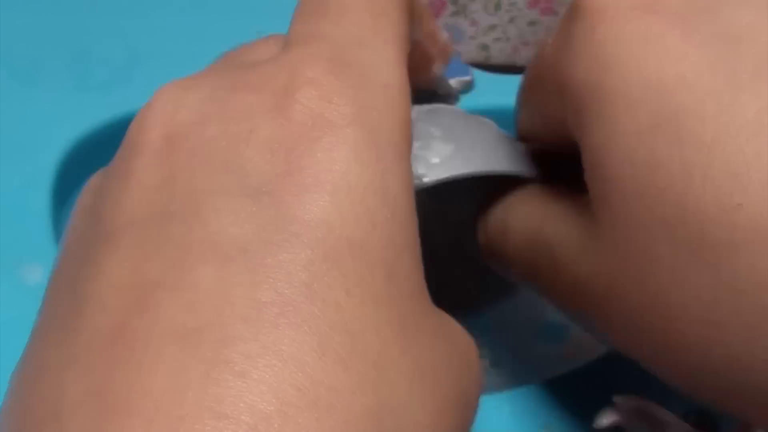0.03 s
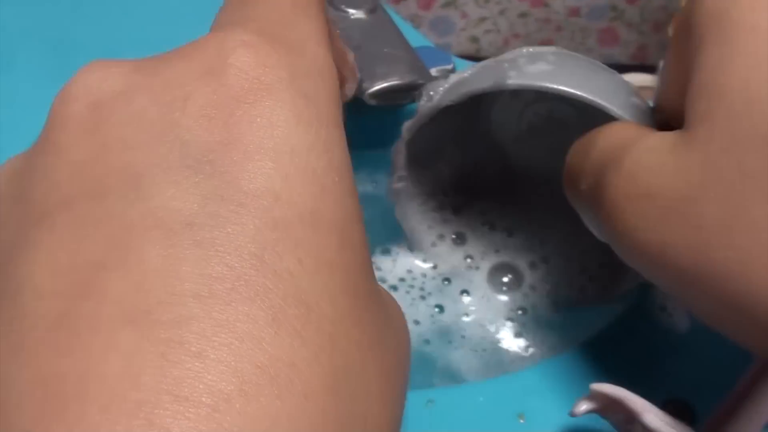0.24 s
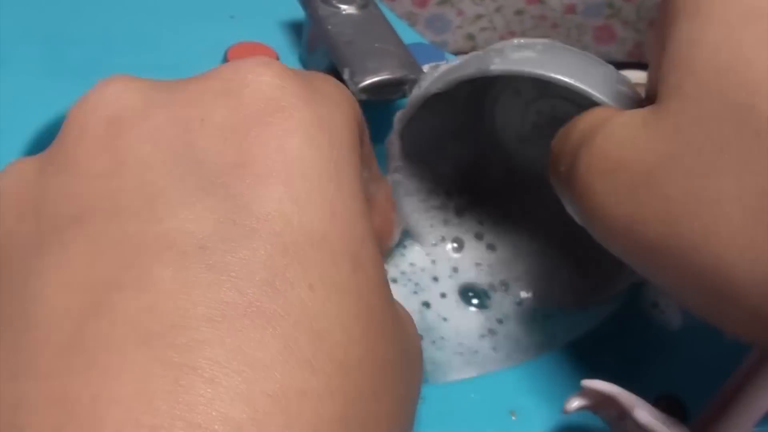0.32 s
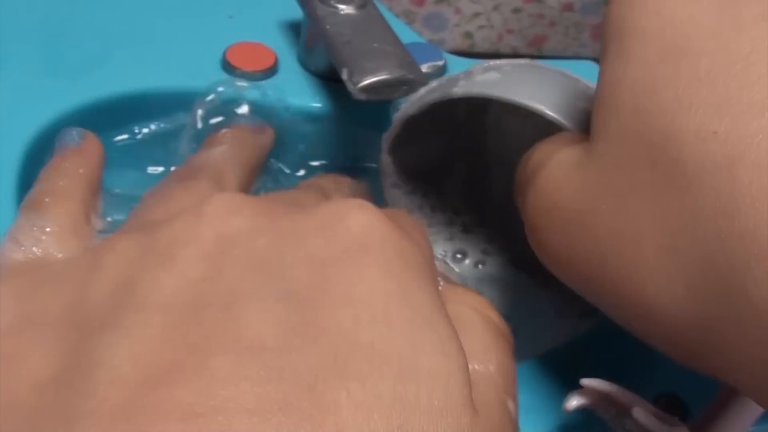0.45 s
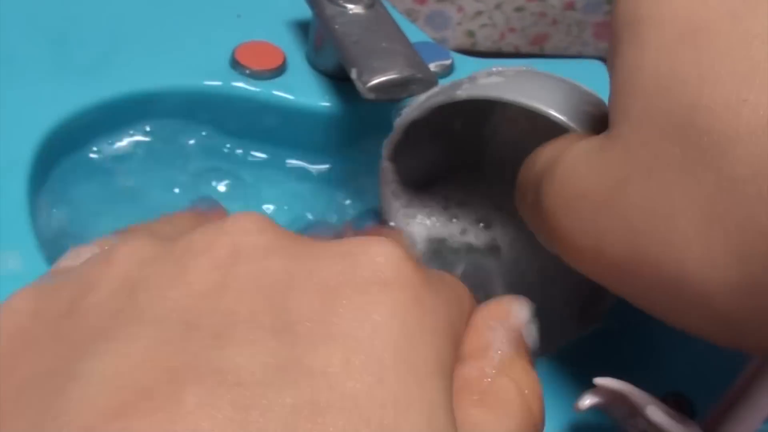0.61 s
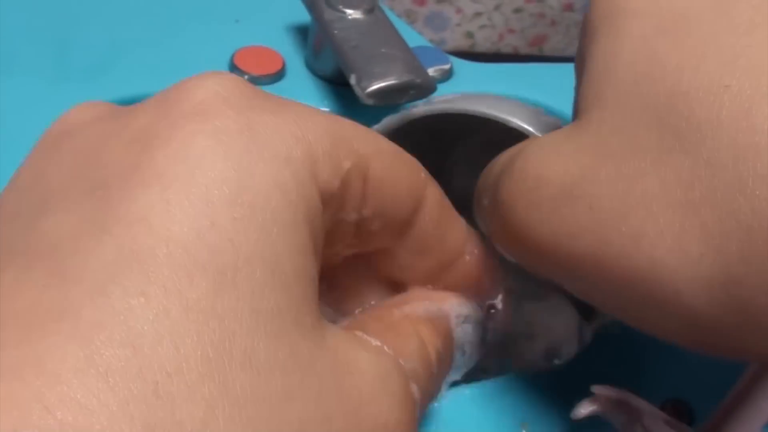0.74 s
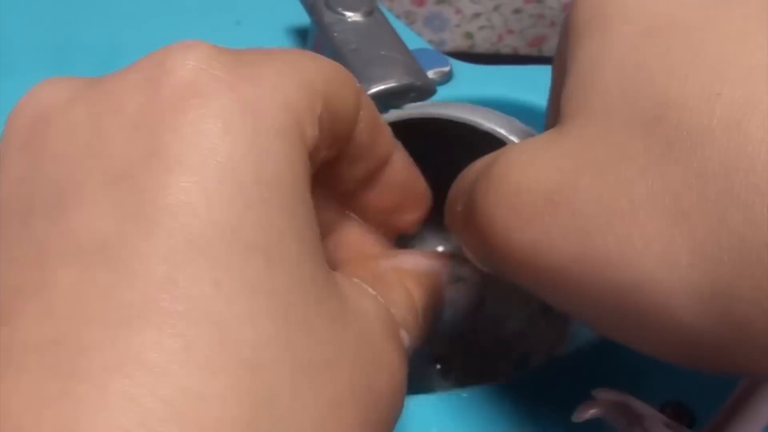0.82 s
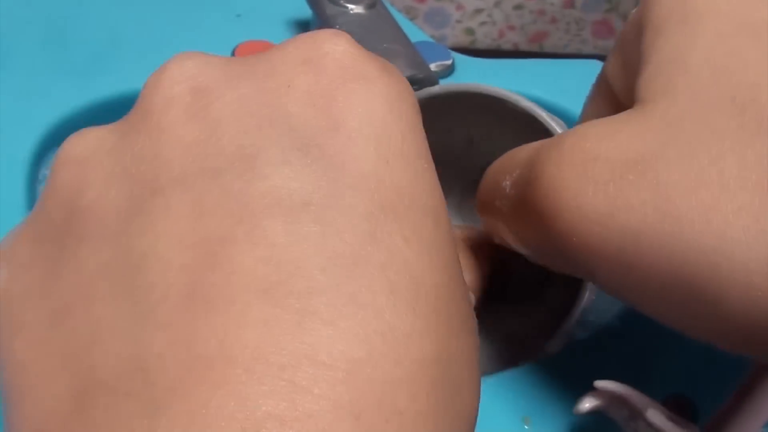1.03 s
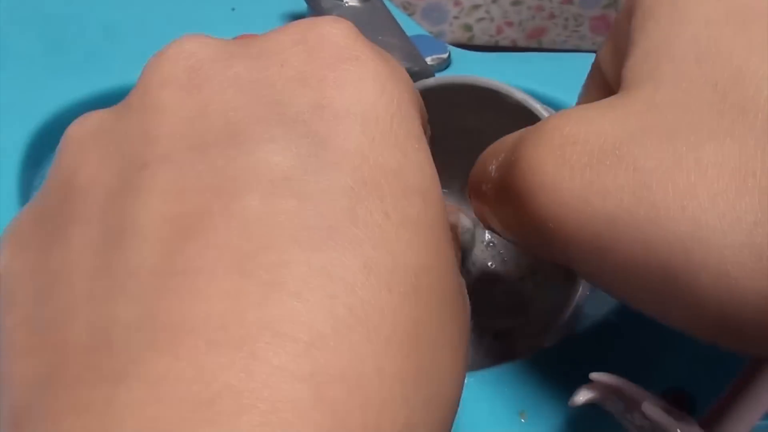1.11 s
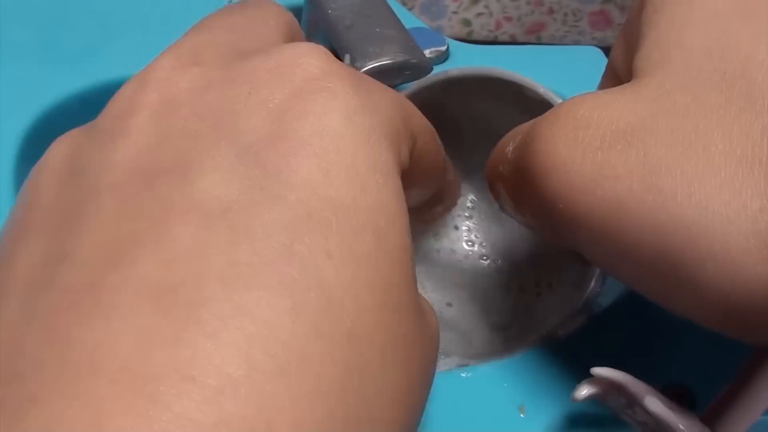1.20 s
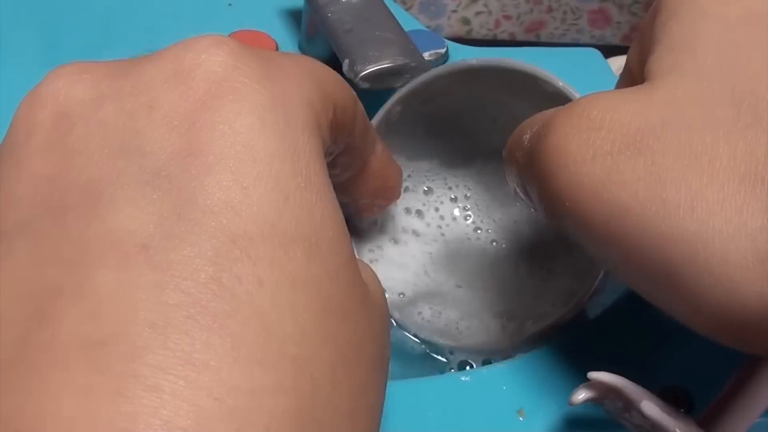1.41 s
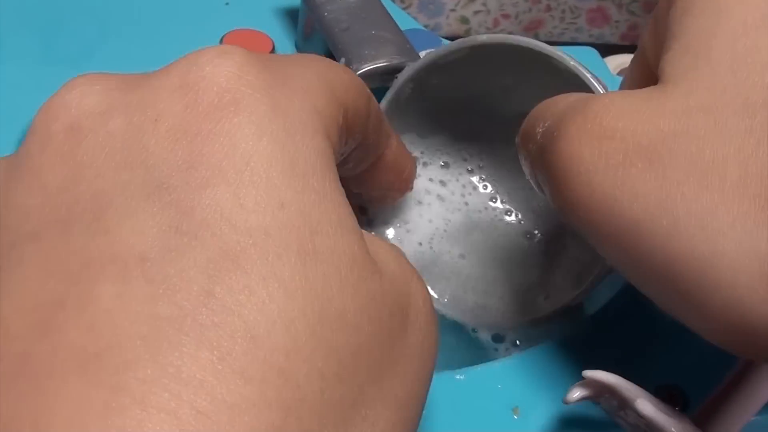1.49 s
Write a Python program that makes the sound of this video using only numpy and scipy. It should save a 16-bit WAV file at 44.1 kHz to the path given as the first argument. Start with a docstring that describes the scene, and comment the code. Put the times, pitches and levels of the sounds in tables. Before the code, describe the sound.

A small plastic cup being washed in soapy water, knocking and scraping against a plastic basin.

```python
"""A quiet room, microphone close to a shallow plastic toy sink where wet hands scrub a small plastic cup.
Soft rubbing and nail ticks come first, then a crackle of foam. At 0.22 s the cup knocks hard and the
hollow basin rings. Scrapes, knocks and popping bubbles follow, with low bumps through the table.
After 1 s the rubbing eases; knocks, a sharp tick and low plops come from 1.2 s, a last light knock
at 1.53 s. The room hisses faintly throughout."""
import sys
import numpy as np
from scipy import signal
from scipy.fft import rfft, irfft
from scipy.io import wavfile
from scipy.ndimage import uniform_filter1d

SR = 44100
rng = np.random.default_rng(int(sys.argv[2]) if len(sys.argv) > 2 else 0)


def dump(signal):
    """Clip the signal to [-1, 1] and save it as 16-bit WAV at the path in sys.argv[1]."""
    limited = np.clip(np.atleast_2d(signal).T, -1, 1)
    pcm = np.round(limited * 32767).astype(np.int16)
    wavfile.write(sys.argv[1], SR, pcm)


N = 68355

# cup striking the basin: start_s, low_modes_db, middle_modes_db, upper_modes_db, contact_s
CUP_KNOCKS = [(0.221, -13, -9, -10, 0.0077), (0.336, -36, -32, -24, 0.0014), (0.378, -34, -34, -50, 0.0014),
              (0.5139, -17, -17.5, -16.5, 0.0026), (0.6, -27, -25, -30, 0.0012),
              (0.68, -28, -23, -26.5, 0.0019), (0.78, -16.5, -25, -18, 0.0056),
              (0.7947, -22, -23, -28, 0.0045), (0.943, -24.5, -29.5, -44, 0.0006),
              (1.071, -33, -31.5, -36, 0.0021), (1.1555, -44, -40, -36, 0.0026),
              (1.2292, -40, -28, -28, 0.00089), (1.2767, -56, -30, -22, 0.0024),
              (1.2789, -24, -21, -37, 0.00086), (1.205, -60, -50, -37, 0.0044),
              (1.533, -41.5, -31, -35.5, 0.0044)]
# resonances of basin and cup: pitch_hz, level_db, t60_s
PLASTIC_MODES = [(205, -15, .05), (245, -9, .05), (320, 0, .038), (392, -3, .034), (460, -6, .035),
                 (555, -5, .03), (728, 0, .03), (868, -2, .035), (975, -5, .025), (1130, -4, .025),
                 (1250, -4, .026), (1450, -4, .02), (1670, -3, .02), (2130, -9, .02), (2400, -6, .022),
                 (3800, -10, .015)]
# scraping and sloshing: start_s, length_s, low_modes_db, middle_modes_db, upper_modes_db, fizz_db
SCRUB_STROKES = [(0, 0.14, -56, -57.5, -62, -58), (0.204, 0.067, -41.5, -37, -43, -48.5),
                 (0.227, 0.082, -36.5, -41.5, -49.5, -55.5), (0.311, 0.042, -35.5, -43, -40.5, -45.5),
                 (0.343, 0.048, -39, -45.5, -56, -54.5), (0.432, 0.066, -38.5, -48, -46, -52.5),
                 (0.45, 0.046, -59, -60, -55, -41), (0.504, 0.014, -59, -30.5, -35.5, -39.5),
                 (0.541, 0.061, -40.5, -44.5, -48.5, -49.5), (0.603, 0.046, -45, -52, -58, -56),
                 (0.655, 0.014, -46, -49, -43, -36.5), (0.67, 0.27, -42, -41, -47.5, -51.5),
                 (0.762, 0.037, -42, -41.5, -32, -41), (0.774, 0.02, -35.5, -27, -33, -31.5),
                 (0.794, 0.021, -48, -37, -48, -55), (0.794, 0.17, -41.5, -45.5, -44.5, -57),
                 (0.891, 0.043, -36.5, -36, -36, -39.5), (0.947, 0.0543, -42.5, -51.5, -57, -52.5),
                 (1.015, 0.14, -57, -72, -59.5, -70), (1.14, 0.2, -56, -59.5, -55, -57.5),
                 (1.266, 0.03, -44, -62, -60, -44), (1.265, 0.049, -44.5, -62, -50, -51),
                 (1.317, 0.064, -53, -55, -54, -58), (1.385, 0.022, -54, -40.5, -47.5, -54),
                 (1.409, 0.026, -42, -54, -56.5, -74), (1.461, 0.1, -80, -62, -59, -78)]
# spectrum of wet skin and foam: frequency_hz, level_db
FIZZ_SPECTRUM = [(1650, 4), (2800, -5), (4400, -0.5), (6190, -6), (8090, -1.5), (10000, -13), (13000, -17),
                 (16500, -39)]
# sharp ticks of nail and rim: start_s, peak_db, centre_hz, decay_s
NAIL_TICKS = [(.007, -36.5, 5530, 0.00091), (.053, -37, 4940, 0.0011), (.102, -36.5, 4200, 0.00025),
              (.112, -40, 4540, 0.00067), (.125, -35, 8500, .0008), (.168, -33, 4620, 0.00035),
              (.2202, -5, 8170, 0.00032), (0.2205, -14, 4030, 0.002), (.2392, -21.5, 5640, 0.00047),
              (.2394, -17, 10400, 0.00029), (.336, -33, 4100, 0.0032), (.341, -21.5, 5830, 0.0032),
              (.380, -37, 4200, 0.00012), (.432, -35, 4940, 0.0004), (.502, -26, 7700, 0.0023),
              (.5128, -16, 5250, 0.0016), (.598, -24.5, 9000, 0.0012), (.599, -26.5, 4420, 0.00046),
              (0.666, -29, 4750, 0.013), (.757, -24, 8050, 0.0029), (.781, -25.5, 3770, 0.0028),
              (.889, -21, 3870, 0.0026), (.9415, -26, 7600, 0.0013), (.969, -37, 7840, 0.0011),
              (1.0765, -24, 8140, 0.00059), (1.231, -27.5, 8200, 0.00071), (1.2758, -13.5, 9200, 0.0035),
              (1.2762, -20.5, 3980, 0.00036), (1.311, -29.5, 8600, 0.0021), (1.5325, -28.5, 4400, 0.0023)]
# bubbles and plops: start_s, level_db, pitch_hz, t60_s
BUBBLE_POPS = [(0.029, -38, 1135, 0.039), (0.323, -25, 846, 0.1), (0.351, -23, 450, 0.053),
               (.358, -35, 503, 0.0055), (.381, -25, 1350, 0.017), (.389, -25.5, 548, 0.027),
               (.432, -24.5, 2070, 0.0075), (.456, -21.5, 1280, 0.024), (.4645, -20, 1360, 0.011),
               (.610, -26, 3260, 0.0033), (.641, -33.5, 2220, 0.011), (0.717, -28, 1450, 0.012),
               (.741, -24, 1490, 0.0078), (0.8895, -12.5, 1670, 0.01), (0.8895, -13.5, 2080, 0.0073),
               (0.928, -19.5, 1390, 0.0089), (0.971, -29.5, 1476, 0.012), (1.2338, -16, 298, 0.046),
               (1.295, -34, 350, 0.099), (1.324, -27, 345, 0.015), (1.407, -22, 296, 0.03)]
# snaps in one crackle of foam: start_s, peak_db
FOAM_SNAPS = [(.1622, -25), (.1634, -27), (.1660, -28), (.1678, -29), (.1718, -35), (.1752, -39),
              (.180, -44)]
# level contour of the bumps through the table: time_s, level_db
BUMP_LEVELS = [(0.0, -65), (0.176, -99), (0.224, -35), (0.272, -50), (0.392, -53), (0.414, -61),
               (0.53, -43.5), (0.578, -63), (0.604, -47.5), (0.638, -59), (0.686, -40.5), (0.708, -54.5),
               (1.204, -62.5), (1.23, -51.5), (1.312, -47.5), (1.36, -58.5), (1.506, -70), (1.55, -52.5)]
# filter from the reflections to the stereo side signal: frequency_hz, gain_db
SIDE_SPECTRUM = [(60, -33), (110, -19), (200, -31), (380, -22.5), (700, -15.5), (1290, -15), (2380, -12),
                 (4400, -14.5), (8120, -19), (15000, -52)]
# spectrum of the room tone: frequency_hz, level_db
ROOM_SPECTRUM = [(15, -53), (25, -18), (192, -5.5), (321, -4.5), (470, -8.5), (809, -5.5), (1090, -10.5),
                 (2980, -19.5), (7300, -18.5), (15200, -24), (16500, -26)]

MODE_BAND_EDGES_HZ = (0, 500, 1000, 9000)  # low, middle and upper modes
KNOCK_DETUNE, SLIP_DETUNE = .015, .07  # scatter, as a fraction of each mode's pitch
STROKE_RISE_S, STROKE_FALL_S = .0067, .0034
SLIPS_PER_S, SLIP_SPREAD_DB = 1500, 2.5
FIZZ_PER_S, FIZZ_SPREAD_DB = 7000, 3.2
TICK_BROAD_DB, TICK_TAIL_DB, TICK_TAIL_S = .5, -65, .0076
POP_ATTACK_CYCLES, POP_RISE_PER_S = .9, 3.63  # rise in multiples of the starting pitch
FOAM_RING_HZ, FOAM_T60_S, SNAP_RISE_S, SNAP_DECAY_S = (6700, 7600), .003, .00036, .0012
ROOM_T60_S, ROOM_MID_DB, ROOM_SIDE_DB = .12, -51, -72
REFLECTION_T60_S, STEREO_DRIFT_HZ = .03, 1.9


def gain_of(db):
    return 10 ** (np.asarray(db) / 20)


def unit_rms(x):
    return x / np.sqrt(np.mean(x ** 2) + 1e-20)


def colour(x, spectrum):
    """Filters by a spectrum of (frequency_hz, gain_db) points."""
    hz, db = np.transpose(spectrum)
    bins_hz = np.fft.rfftfreq(len(x), 1 / SR)
    gain = gain_of(np.interp(np.log(bins_hz + 1), np.log(hz + 1), db))
    return irfft(rfft(x) * gain, len(x))


def add(mix, start_s, sound):
    part = mix[round(start_s * SR):][:len(sound)]
    part += sound[:len(part)]


def ring(hz, t60_s):
    t = np.arange(5000) / SR
    return gain_of(-60 * t / t60_s) * np.sin(2 * np.pi * hz * t)


def clicks(per_s, spread_db):
    """Impulses of random time, size and sign."""
    size = gain_of(spread_db * np.minimum(rng.exponential(1, N), 3))
    return size * rng.choice([-1., 1.], N) * (rng.random(N) < per_s / SR)


def plastic_body(pitch_ratios):
    """Impulse responses of the low, middle and upper modes; neighbours start in opposite phase."""
    modes = [(hz, (-1) ** k * gain_of(db) * ring(hz * pitch_ratios[k], t60_s))
             for k, (hz, db, t60_s) in enumerate(PLASTIC_MODES)]
    return [sum(mode for hz, mode in modes if low < hz < high)
            for low, high in zip(MODE_BAND_EDGES_HZ, MODE_BAND_EDGES_HZ[1:])]


def cup_knocks():
    """The cup hits the basin: a rounded first contact and a short chatter set the modes ringing."""
    out, t = np.zeros(N), np.arange(880) / SR
    for start_s, *bands_db, contact_s in CUP_KNOCKS:
        noise = rng.standard_normal(900)
        force = .035 * noise[:len(t)] * np.exp(-t / contact_s)  # chatter
        force[0] = 1  # first contact
        force = uniform_filter1d(np.r_[np.zeros(6), force], size=7)
        body = plastic_body(1 + KNOCK_DETUNE * noise[-len(PLASTIC_MODES):])
        for db, response in zip(bands_db, body):
            knock = signal.fftconvolve(force, response)
            add(out, start_s, gain_of(db) * knock / abs(knock).max())
    return out


def scrubbing():
    """Uneven slips ring the modes during each stroke; fine fizz of wet skin and foam lies on top."""
    t, power = np.arange(N) / SR, np.zeros((4, N))
    for start_s, length_s, *layers_db in SCRUB_STROKES:
        rise = np.clip((t - start_s) / STROKE_RISE_S, 0, 1)
        fall = np.exp(-np.maximum(t - start_s - length_s, 0) / STROKE_FALL_S)
        power += (gain_of(layers_db)[:, None] * rise * fall) ** 2
    # water and grip shift the modes
    grips = [plastic_body(1 + SLIP_DETUNE * rng.standard_normal(len(PLASTIC_MODES))) for _ in range(6)]
    layers = np.zeros((4, N))  # three bands of modes, then the fizz
    for band, responses in enumerate(zip(*grips)):
        for response in responses:
            slips = uniform_filter1d(clicks(SLIPS_PER_S / len(grips), SLIP_SPREAD_DB), size=7)
            layers[band] += signal.oaconvolve(slips, response)[:N]
    layers[3] = colour(clicks(FIZZ_PER_S, FIZZ_SPREAD_DB), [(1000, -50), *FIZZ_SPECTRUM])
    return sum(unit_rms(layer) * level for layer, level in zip(layers, np.sqrt(power)))


def nail_ticks():
    """Nail and rim tick: a noise burst, partly broad, partly ringing at its centre, with a faint tail."""
    out, t = np.zeros(N), np.arange(3000) / SR
    highpass = signal.butter(2, 2500, "high", fs=SR)
    for start_s, db, centre_hz, decay_s in NAIL_TICKS:
        tail = gain_of(TICK_TAIL_DB) * np.exp(-t / TICK_TAIL_S)
        burst = rng.standard_normal(len(t)) * (np.exp(-t / decay_s) + tail)
        ringing = unit_rms(signal.fftconvolve(burst, ring(centre_hz, t60_s=.002))[:len(t)])
        broad = gain_of(TICK_BROAD_DB) * unit_rms(signal.lfilter(*highpass, burst))
        lowpass = signal.butter(2, min(1.3 * centre_hz, 10000), fs=SR)
        tick = signal.lfilter(*lowpass, ringing + broad)
        add(out, start_s, gain_of(db) * tick / abs(tick).max())
    return out


def bubbles():
    """Each bubble rings as a dying sine that rises a little in pitch."""
    out, t = np.zeros(N), np.arange(4000) / SR
    for start_s, db, pitch_hz, t60_s in BUBBLE_POPS:
        envelope = np.minimum(t * pitch_hz / POP_ATTACK_CYCLES, 1) * gain_of(db - 60 * t / t60_s)
        phase = 2 * np.pi * pitch_hz * (t + POP_RISE_PER_S * t ** 2 / 2)
        add(out, start_s, envelope * np.sin(phase))
    return out


def foam_crackle():
    """Foam snaps in quick bursts of noise that ring in two high resonances."""
    out, t = np.zeros(N), np.arange(1000) / SR
    rings = [ring(hz, FOAM_T60_S) for hz in FOAM_RING_HZ]
    response = sum(signal.fftconvolve(x, x)[:len(t)] for x in rings)  # each resonance filters twice
    envelope = np.minimum(t / SNAP_RISE_S, 1) * np.exp(-t / SNAP_DECAY_S)
    for start_s, db in FOAM_SNAPS:
        snap = signal.fftconvolve(rng.standard_normal(len(t)) * envelope, response)
        add(out, start_s, gain_of(db) * snap / abs(snap).max())
    return out


def table_bumps():
    """Low noise swells through the table as the sink is pushed."""
    rumble = colour(rng.standard_normal(N),
                    [(25, -2.5), (60, 2.5), (130, 10.5), (180, 16.5), (260, -57), (600, -78)])
    level_db = np.interp(np.arange(N) / SR, *np.transpose(BUMP_LEVELS))
    return unit_rms(rumble) * gain_of(level_db)


def room_tail(close):
    """The room answers with a short diffuse tail, duller than the close sound and 3 ms behind it."""
    t = np.arange(SR // 3) / SR
    response = rng.standard_normal(len(t)) * gain_of(-60 * t / ROOM_T60_S) * (t > .003)
    tail = signal.fftconvolve(close, response / np.linalg.norm(response))[:N]
    return colour(tail, [(1500, -8.5), (8000, -16)])


def side_reflections(mid):
    """Short reflections drift slowly between two patterns, keeping the stereo sound wide and balanced."""
    t, side = np.arange(1500) / SR, np.zeros(N)
    drift = 2 * np.pi * STEREO_DRIFT_HZ * np.arange(N) / SR
    for weight in (np.sin(drift), np.cos(drift)):
        pattern = rng.standard_normal(len(t)) * gain_of(-60 * t / REFLECTION_T60_S)
        side += signal.fftconvolve(mid * weight, pattern / np.linalg.norm(pattern))[:N]
    return colour(side, SIDE_SPECTRUM)


def room_tone(level_db):
    """The steady hiss of the quiet room."""
    return gain_of(level_db) * unit_rms(colour(rng.standard_normal(N), ROOM_SPECTRUM))


def scene():
    """The sink close up and centred, the room behind it; mid and side give left and right."""
    close = cup_knocks() + nail_ticks() + bubbles() + foam_crackle() + scrubbing()
    low_cut = signal.butter(4, 190, "high", fs=SR, output="sos")  # a small basin radiates no bass
    close = signal.sosfilt(low_cut, close)
    mid = close + room_tone(ROOM_MID_DB) + room_tail(close) + table_bumps()
    side = side_reflections(mid) + room_tone(ROOM_SIDE_DB)
    return np.array([mid + side, mid - side])


def record(dry):
    """The microphone chain cuts off steeply near 16 kHz."""
    lowpass = signal.firwin(511, cutoff=15950, window=("kaiser", 9), fs=SR)
    return signal.oaconvolve(dry, lowpass[None], "same")


dry = scene()
out = record(dry)
dump(out)
```